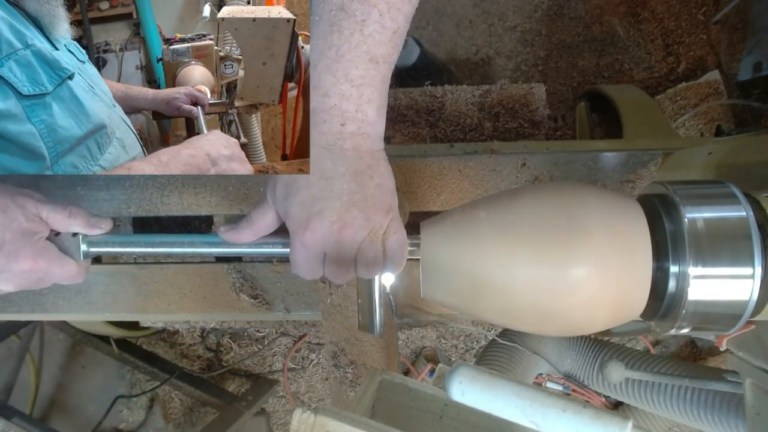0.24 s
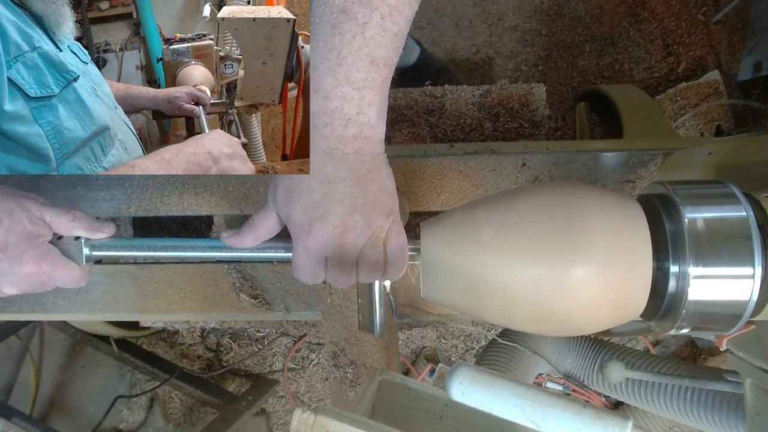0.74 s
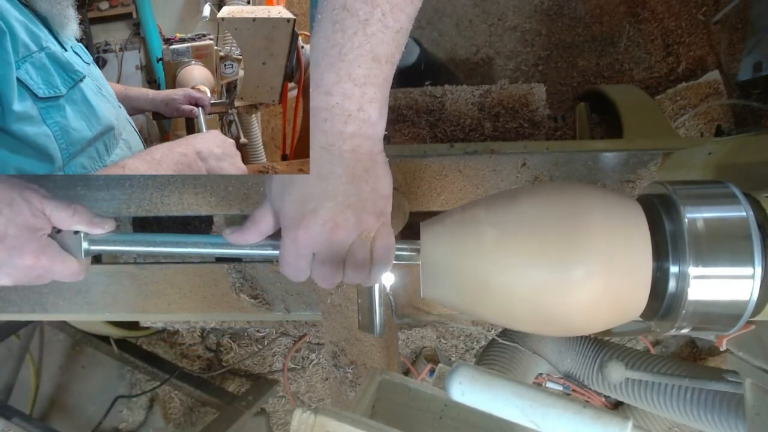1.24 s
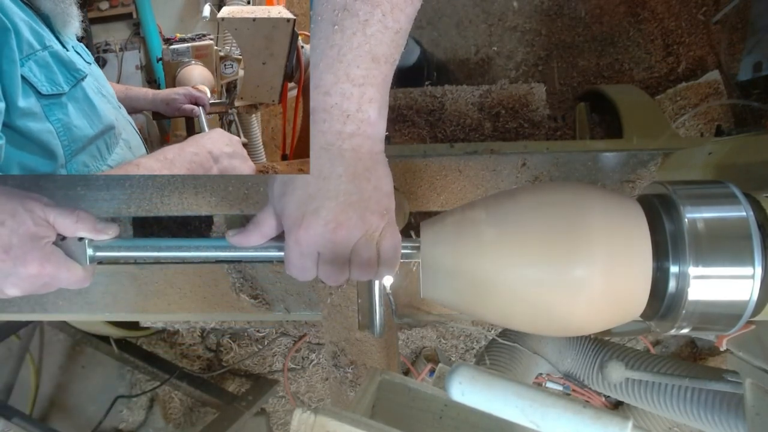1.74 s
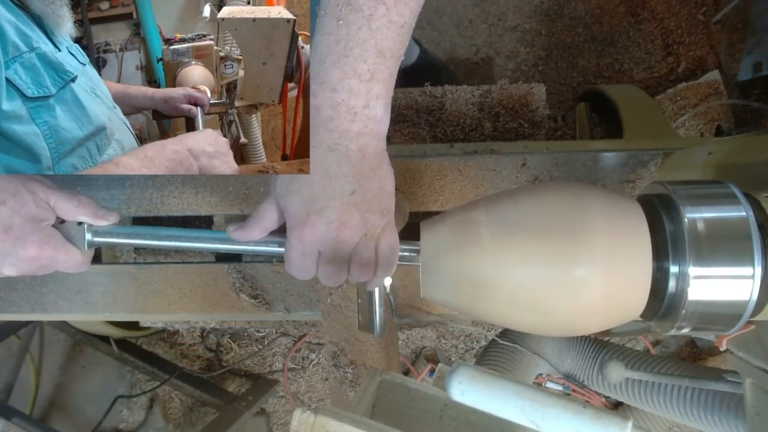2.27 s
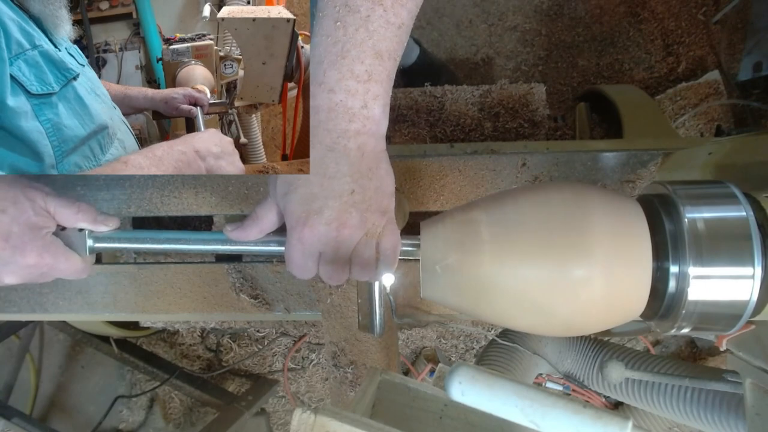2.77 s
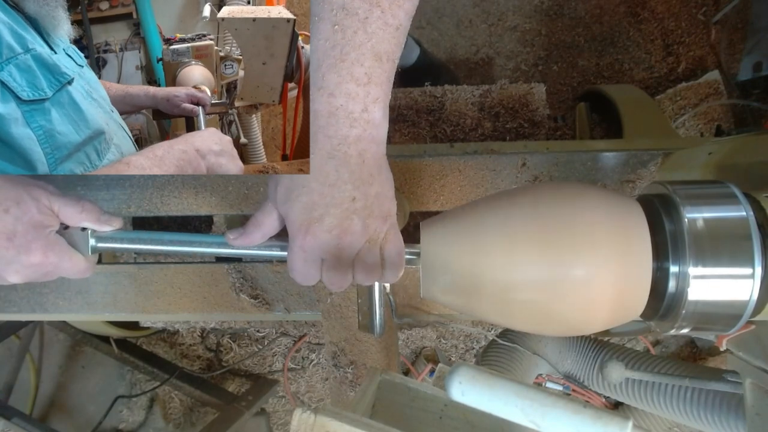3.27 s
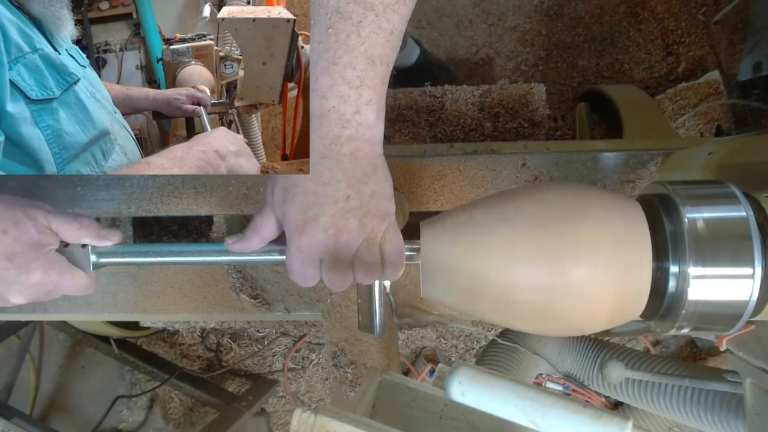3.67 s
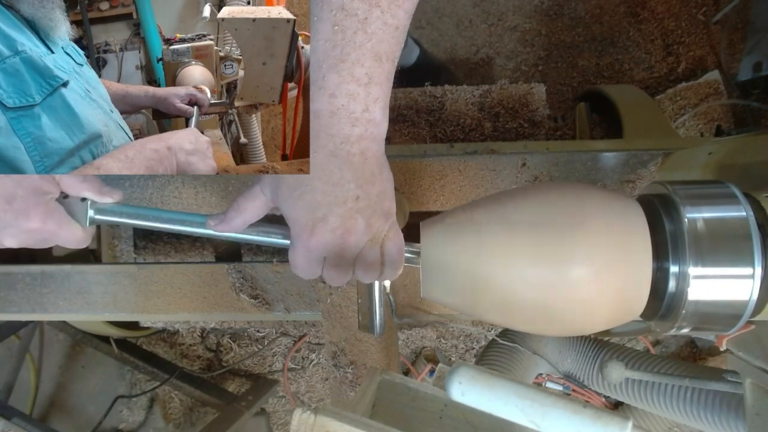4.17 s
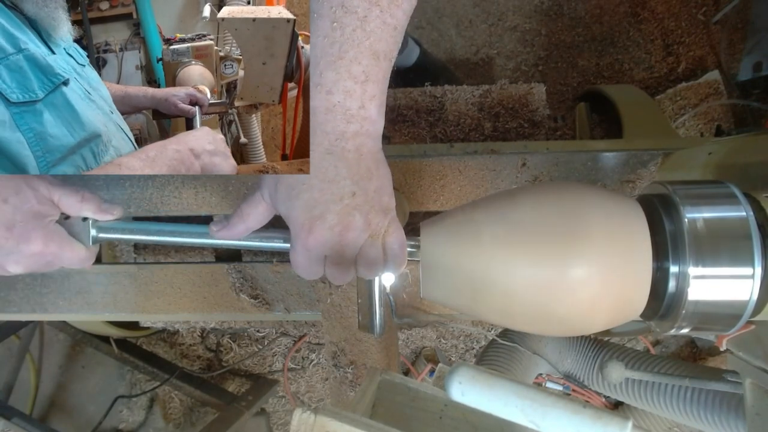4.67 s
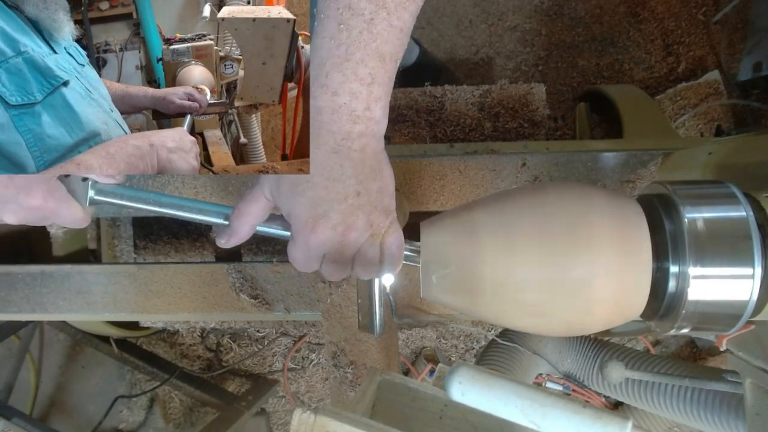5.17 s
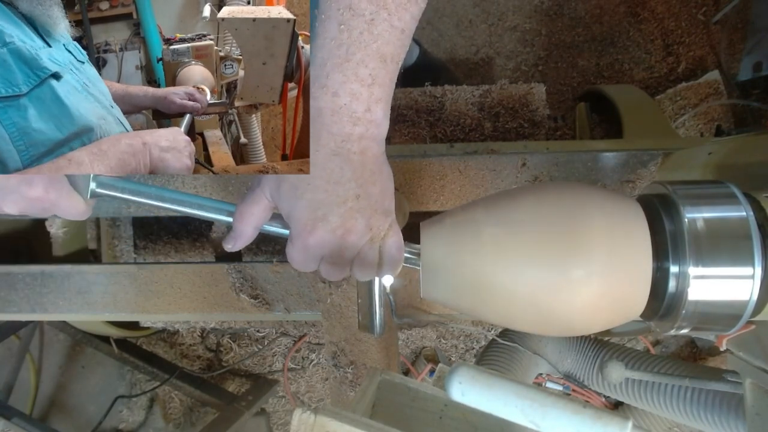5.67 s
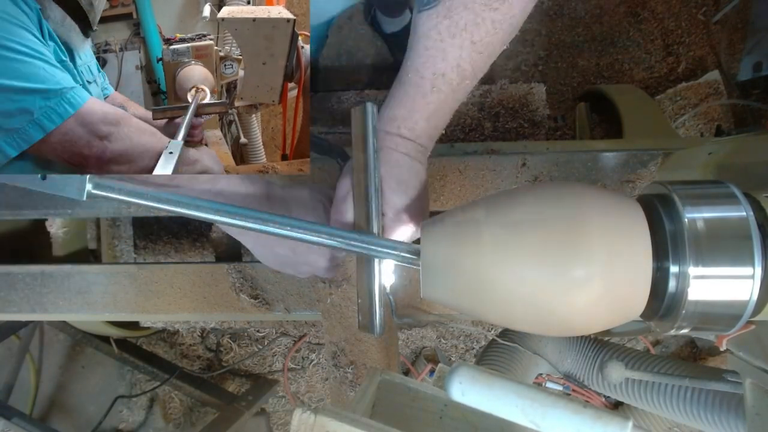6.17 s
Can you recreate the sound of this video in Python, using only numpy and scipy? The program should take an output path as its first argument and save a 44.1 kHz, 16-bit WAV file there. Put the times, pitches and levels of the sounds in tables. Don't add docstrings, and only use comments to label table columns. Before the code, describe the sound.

Loud, rough tearing strokes shriek and boom inside a turning hollow wooden vase, with low judders between them, before only the humming lathe remains.

```python
import sys
import numpy as np
from scipy import signal
from scipy.io import wavfile
from scipy.ndimage import uniform_filter1d

SR = 44100
rng = np.random.default_rng(int(sys.argv[2]) if len(sys.argv) > 2 else 0)


def ratio(d):
    e = np.asarray(d, float) / 20
    return 10 ** e


def unload_wav(signal):
    wavfile.write(
        sys.argv[1],
        SR,
        np.round(np.clip(np.atleast_2d(signal).T, -1, 1) * 32767).astype(np.int16),
    )


N = 282681

# (full contact [s], lift-off [s], edge level [dB], rise [dB/s], fall [dB/s])
STROKES = [(0.0, 0.338, -23.5, 895, 646), (.36, 0.408, -41, 898, 400), (0.6, 1.13, -17.5, 1398, 748),
           (1.386, 2.11, -18.5, 1501, 537), (2.168, 2.182, -32, 896, 600), (2.335, 2.4, -40, 500, 100),
           (2.426, 2.45, -24.5, 153, 500), (2.435, 2.706, -17, 502, 602), (3.117, 3.814, -23.5, 437, 478),
           (4.117, 4.28, -34, 1100, 500), (4.29, 4.916, -21.5, 399, 801), (5.243, 5.247, -23.5, 752, 750.5)]
# (time [s], edge gain [dB], length [s], further vase gain [dB])
DIGS = [(.01, 3, 0.01, 1.7), (0.285, 7.5, 0.09, 0.5), (0.749, 3, 0.063, 1), (0.843, -1.5, .04, 2),
        (0.914, -3, .05, -1.5), (1.003, 2.5, 0.064, 1.5), (1.395, 1, 0.031, 6.5), (1.555, 2, .05, 2),
        (1.686, -1, 0.067, 0.5), (1.891, 2.5, 0.042, -0.5), (1.993, 1, 0.028, -2),
        (2.518, -4.5, 0.032, -10), (2.551, 2, 0.012, -2.5), (2.702, 1.5, .03, -1), (3.154, 5.5, 0.024, 2.5),
        (3.242, 5, 0.049, .5), (3.374, 6, 0.054, 1), (3.429, -6, .03, 6.5), (3.513, 4, 0.065, -0.5),
        (3.55, 2, .03, 3), (3.656, -1.5, 0.1, -4), (3.724, 8.5, 0.041, 2.5), (4.135, 6, .05, -1.5),
        (4.332, 2.5, .05, -0.5), (4.445, -3.5, 0.041, -6), (4.508, 6.5, 0.022, -4.5),
        (4.62, 0.5, 0.056, 2.5), (4.727, 5, 0.027, .5), (4.869, 5.5, 0.084, 1)]
# (time [s], reach [-1 deep in the shoulder to 1 near the mouth])
REACH = [(0, 1), (.35, 0.42), (.8, 0.34), (1.15, 0.56), (1.42, 1), (1.55, -0.27), (1.8, -0.028),
         (2.05, -0.49), (2.35, -0.16), (2.6, -0.11), (3.2, -0.78), (3.45, -.5), (3.6, 0.035), (3.85, 1),
         (4.15, 0.058), (4.499, -1.3), (4.9, -0.44), (5.25, -1.1)]


def stroke_levels():
    time = np.arange(N) / SR
    strokes = []
    for start, end, db, rise, fall in STROKES:
        approach = rise * np.maximum(start - time, 0)
        departure = fall * np.maximum(time - end, 0)
        strokes.append(db - approach - departure)
    contact = np.max(strokes, axis=0)
    dig, boom = sum(np.outer([db, vase_db], bump(s, length)) for s, db, length, vase_db in DIGS)
    reach = np.interp(time, *np.transpose(REACH))
    vase = dig + boom + 3 - 2 * reach
    hiss = 1.35 * dig - 5 - 1.5 * reach
    levels = contact + np.array([dig, vase, hiss])
    return uniform_filter1d(np.maximum(levels, -90), size=200, axis=1)


# (frequency [Hz], width [Hz], left level [dB], right level [dB], gain per unit of reach [dB])
BAR_MODES = [(1550, 162, -9.5, -7.5, 0.5), (1730, 72, -12, -5.5, -2.5), (2056, 51, -9.5, -2.5, -3.5),
             (2165, 95, 0.5, -8.5, -2.5), (2225, 67, -8.5, -9.5, -8), (2386, 155, -22, -7, -4),
             (2510, 168, -15.5, -2.5, 1.5), (2616, 114, -5.5, 0, 5.5), (2700, 84, -4, -4.5, 5),
             (2842, 130, -8.5, -18.5, -2)]
VASE_MODES = [(468.6, 147, -13.5, -20.5, 1), (566.5, 84, -11.5, -9, 2.5), (620.4, 81, -6, -6, -1.5),
              (695, 54, -6.5, -3, 0), (756.5, 53.3, 3, -1.5, -1.8), (932, 51, -9.5, -9.5, -0.5),
              (985, 95, -0.5, -3.5, -2.6), (1088.6, 56, -7.5, -6, 1), (1302, 117, -13, -10, -1.2)]
TIP_MODES = [(3799, 88, -11, -1.5, 7.5), (3850, 110, -11, 2, 7), (4430, 120, -1.5, -0.5, -2.5),
             (4825, 250, -8.5, -3.5, 2), (5160, 280, -7, -5, 1), (5535, 360, -9.5, -3, 1),
             (6120, 140, -1.5, -5, -2), (6376, 200, -9, 0.5, 2), (7110, 180, -6, -6.5, -5.5),
             (7293, 223, -2, -1, -2.5)]


def cutting(levels):
    bar, vase, tip = ratio(levels + 1.65 * drift(26))
    bar = ringing_part(bar, BAR_MODES, 1510, 3320, broad_db=-8.0, wander_db=1.55, alike=0.13)
    vase = ringing_part(vase, VASE_MODES, 150, 1500, broad_db=-5.5, wander_db=4.5, alike=-0.13)
    tip = ringing_part(tip, TIP_MODES, 3050, 8240, broad_db=0.0, wander_db=2.5, alike=0.081)
    return ratio(-1.0) * bar + ratio(-1.82) * vase + ratio(-2.5) * tip


# (frequency [Hz], level per Hz [dB])
TEARING = [(88, -40), (150, -5.5), (258, -11.5), (345, -2.5), (477, -8.5), (767, 0.5), (864, -18),
           (990, -23), (1890, 3.5), (2650, 7.5), (3090, -33), (7230, -39), (8720, -23.5), (11300, -66),
           (19200, -120)]
# (frequency [Hz], left minus right [dB])
TEARING_SIDE = [(60, 1.0), (94, 0.5), (150, -7), (230, 7.5), (360, -3), (560, 7.5), (880, -4), (1380, 4.5),
                (2160, -9.5), (3380, -1), (5280, -11.5), (8270, 0.5)]


def ringing_part(force, modes, low_hz, high_hz, broad_db, wander_db, alike):
    snaps = fibres(per_s=7000, spread_db=2.0, alike=alike)
    reach = np.interp(np.arange(N) / SR, *np.transpose(REACH))
    played, power = 0, 0
    for hz, width, left_db, right_db, reach_db in modes:
        gain = ratio([[left_db], [right_db]]) * ratio(reach_db * reach + wander_db * drift(4.0))
        played = played + sharp(force * gain * snaps, hz, width)
        power = power + np.mean(gain ** 2, axis=0) * width * np.pi / 2 / SR
    ringing = played / np.sqrt(power)
    white = [snaps, fibres(per_s=9000, spread_db=2.3, alike=alike)]
    broad = coloured(white, TEARING, TEARING_SIDE, low_hz, high_hz, patchy_db=0.8)
    return ringing + ratio(broad_db) * force * broad


def fibres(per_s, spread_db, alike):
    snapping = rng.random(N) < per_s / SR
    sizes = ratio(spread_db * np.minimum(rng.exponential(1, N), 5)) * snapping
    left, own = rng.standard_normal((2, N))
    right = alike * left + np.sqrt(1 - min(alike ** 2, 1)) * own
    return rms_one(sizes * np.array([left, right]))


# (time [s], level [dB], ring [Hz], ring width [Hz], contact [s])
KNOCKS = [
    (2.168, -27, 5100, 2500, 0.0062),
    (5.24, -27.5, 7000, 497, 0.015),
    (5.243, -23.5, 2230, 199, 0.015),
    (5.25, -18, 2650, 198, 0.013),
    (5.522, -24.5, 2190, 110, 0.007),
    (5.522, -25.5, 1040, 497, 0.0089),
]


def knocks():
    return bursts(KNOCKS)


# (time [s], level [dB], ring [Hz], ring width [Hz], length [s])
JUDDERS = [
    (.7, -30.5, 142.5, 60, 0.095),
    (1.7, -29.5, 154, 60, 0.2),
    (2.55, -31.5, 157, 59.2, 0.23),
    (3.2, -17.5, 119, 59, 0.056),
    (4.353, -23, 148, 58.8, 0.076),
    (4.68, -23.5, 130, 59, 0.041),
]


def judders():
    return bursts(JUDDERS)


def bursts(events):
    out = np.zeros((2, N))
    half = SR // 4
    time = np.arange(-half, half) / SR
    for s, db, hz, width, length in events:
        shake = rms_one(sharp(rng.standard_normal((2, len(time))), hz, width))
        start = round(s * SR) - half
        out[:, start:start + len(time)] += ratio(db) * np.exp(-2 * (time / length) ** 2) * shake
    return out


def room(x):
    t60_s, level_db = 0.067, -20.5
    time = np.arange(SR // 2) / SR
    tail = rng.standard_normal((2, len(time))) * ratio(-60 * time / t60_s) * (time > .004)
    tail = tail / np.sqrt(np.sum(tail ** 2, axis=1, keepdims=True))
    return ratio(level_db) * signal.fftconvolve(x, tail, axes=1)[:, :N]


# (time [s], gain [dB], length [s])
SWELLS = [(0.036, 1.5, 0.054), (.2, 0, 0.067), (.77, 10, 0.11), (1.3, 4.5, 0.071), (1.544, 5, 0.094),
          (1.876, 7.5, 0.09), (2.24, -12, 0.11), (2.505, 10, 0.054), (3.2, 10, 0.091), (4.058, 3, 0.071),
          (4.346, 5, 0.14), (4.798, 2, 0.05), (4.97, -8, 0.077), (5.204, 2.5, 0.13), (5.354, -22, 0.059),
          (5.46, 4.5, 0.11), (5.67, -10, .05), (5.765, 7.5, 0.076), (6.02, 1.5, .08), (6.19, -2, 0.11),
          (6.375, 10.5, 0.054)]
# (time [s], gain [dB], length [s])
SHUDDERS = [(.15, 1.5, .2), (.9, 6, .1), (1.4, 8, 0.09), (2.0, 1, .1), (2.24, -10, 0.11), (2.4, 4, 0.092),
            (2.75, 4.5, 0.17), (3.8, -4, 0.13), (4.1, -2, .1), (4.35, 3, 0.12), (5.6, -8, .15),
            (5.85, 4, .1), (6.38, 8, 0.13)]


def lathe(ducking):
    phase = 2 * np.pi * np.cumsum(352.2 + 6.69 * drift(10.65)) / SR
    apart = 0.96 * drift(6.6) * [[1], [-1]]
    hum = np.sqrt(2) * np.sin(phase + apart)
    hum_db = -29.5 + 3 * drift(5.7) + sum(db * bump(s, length) for s, db, length in SWELLS)
    bed = signal.butter(2, [18, 90], "band", fs=SR, output="sos")
    rumble = rms_one(signal.sosfilt(bed, rng.standard_normal((2, N))))
    rumble_db = -34 + 2 * drift(5.0) + sum(db * bump(s, length) for s, db, length in SHUDDERS)
    return ratio(hum_db) * ducking ** 0.63 * hum + ratio(rumble_db) * ducking ** 0.5 * rumble


# (frequency [Hz], level per Hz [dB])
SHOP_AIR = [(47, -30), (80, -3), (363, -5), (468, -6.5), (693, -10.5), (1070, -14), (2000, -22.5),
            (2430, -21), (2960, -29), (5550, -31), (6120, -38.5), (6500, -32), (8720, -60.5), (11300, -86),
            (19200, -120)]
# (frequency [Hz], left minus right [dB])
SHOP_SIDE = [(60, -2.5), (210, 3), (700, 2.5), (2410, -3), (8270, -4.5)]
# (frequency [Hz], width [Hz], level [dB], left-right likeness [0-1])
SHOP_RESONANCES = [(127, 34, -35.5, 0.02), (442, 20, -34, 0.48), (649, 12, -37, 0.26), (915, 19, -46, 0),
                   (1218, 38, -42.5, .1), (6500, 80, -55.5, 0.2)]


def workshop():
    white = rng.standard_normal((2, 2, N))
    out = ratio(-27) * coloured(white, SHOP_AIR, SHOP_SIDE, 80.2, 8930, patchy_db=1.4)
    return out + sum(ratio(db) * narrow_noise(hz, width, alike) for hz, width, db, alike in SHOP_RESONANCES)


def narrow_noise(hz, width, alike):
    both, own = rng.standard_normal(N), rng.standard_normal((2, N))
    alike = np.clip(alike, 0, 1)
    mixed = np.sqrt(alike) * both + np.sqrt(1 - alike) * own
    return rms_one(resonate(mixed, hz, width))


def coloured(white, spectrum, balance, low_hz, high_hz, patchy_db):
    out = 0
    edges = np.geomspace(low_hz, high_hz, int(3 * np.log2(high_hz / low_hz)) + 2)
    for k, (low, high) in enumerate(zip(edges, edges[1:])):
        band_filter = signal.butter(2, [low, high], "band", fs=SR, output="sos")
        band = signal.sosfilt(band_filter, white[k % 2])
        hz = np.sqrt(low * high)
        level = ratio(at_hz(spectrum, hz) + patchy_db * drift(8.8))
        out = out + band * level * sides(at_hz(balance, hz))
    return rms_one(out)


def resonate(x, hz, width_hz):
    r = np.exp(-np.pi * width_hz / SR)
    poles = [1, -2 * r * np.cos(2 * np.pi * hz / SR), r * r]
    return signal.lfilter([(1 - r * r) / 2, 0, (r * r - 1) / 2], poles, x)


def sharp(x, hz, width_hz):
    return resonate(resonate(x, hz, width_hz), hz, width_hz)


def drift(rate):
    r = np.exp(-80 * np.pi * rate / SR)
    white = rng.standard_normal(N // 40 + 2002)
    slow = signal.lfilter([1], [1, -2 * r, r * r], white)[2000:]
    return np.interp(np.arange(N) / 40, np.arange(len(slow)), rms_one(slow))


def bump(s, length):
    return np.exp(-2 * ((np.arange(N) / SR - s) / length) ** 2)


def rms_one(x):
    return x / np.sqrt(np.mean(x ** 2) + 1e-20)


def at_hz(points, hz):
    table_hz, table_db = np.transpose(points)
    return np.interp(np.log(hz), np.log(table_hz), table_db)


def sides(db):
    return ratio(np.array([[db / 2], [-db / 2]]))


def gain_control(levels, knee_db, depth, release_db_s):
    over = np.maximum(levels.max(axis=0) - knee_db, 0)
    ramp = release_db_s * np.arange(N) / SR
    held = np.maximum.accumulate(depth * over + ramp) - ramp
    smooth = signal.lfilter([.002], [1, -.998], np.maximum(held, 0), zi=[held[0]])[0]
    return ratio(-smooth)


def scene():
    levels = stroke_levels()
    cut = cutting(levels) + knocks()
    ducking = gain_control(levels, knee_db=-25.5, depth=0.84, release_db_s=19.0)
    background = lathe(ducking) + ducking * workshop()
    return ratio(2.5) * (cut + room(cut) + judders() + background)


def roll_off(x):
    return signal.sosfilt(signal.butter(12, 15900, fs=SR, output="sos"), x)


def record(dry):
    narrow = signal.sosfilt(signal.butter(12, 7900, fs=SR, output="sos"), dry)
    squeezed = narrow / (1 + np.abs(narrow / 1.06) ** 6) ** (1 / 6)
    edge = signal.cheby2(16, 60, 9450, fs=SR, output="sos")
    grit_band = signal.cheby2(6, 50, [10300, 16300], "band", fs=SR, output="sos")
    mix = signal.sosfilt(edge, squeezed) + signal.sosfilt(grit_band, squeezed)
    return roll_off(mix)


dry = scene()
out = record(dry)
unload_wav(out)
```